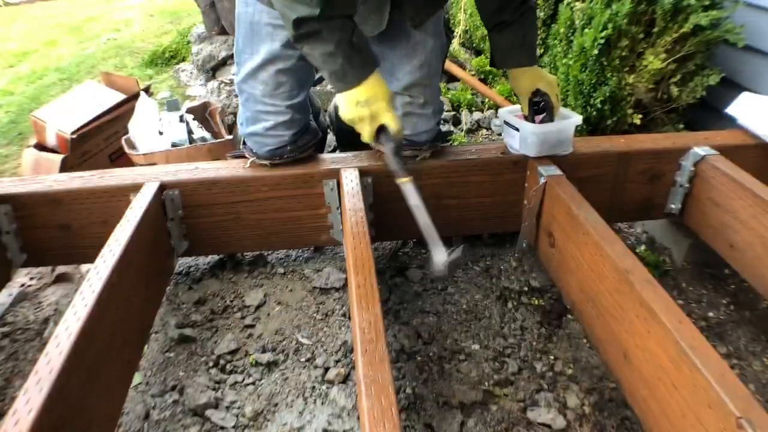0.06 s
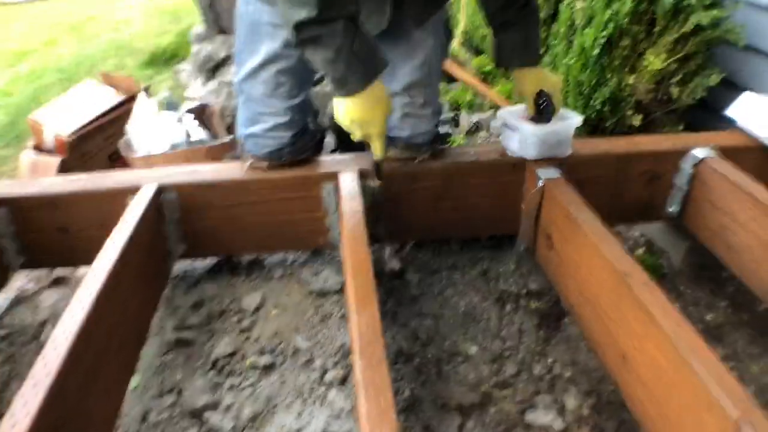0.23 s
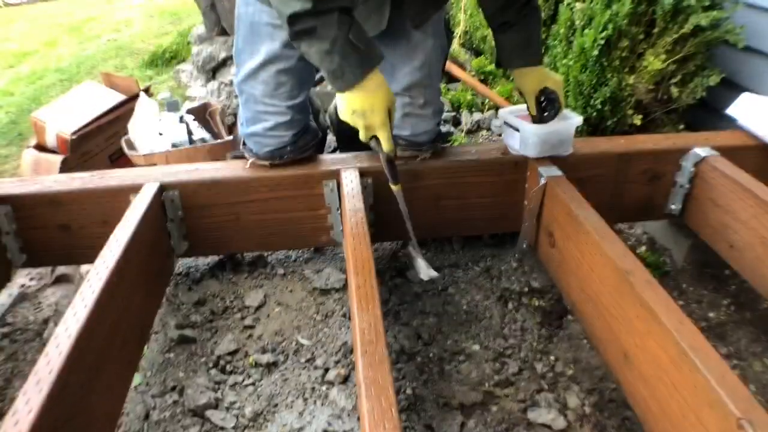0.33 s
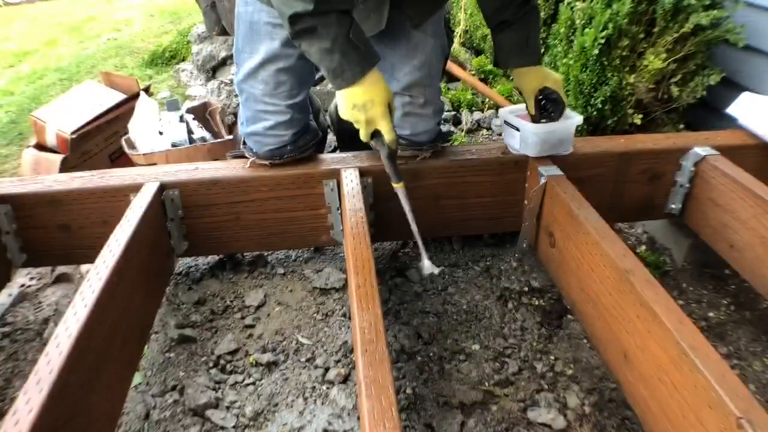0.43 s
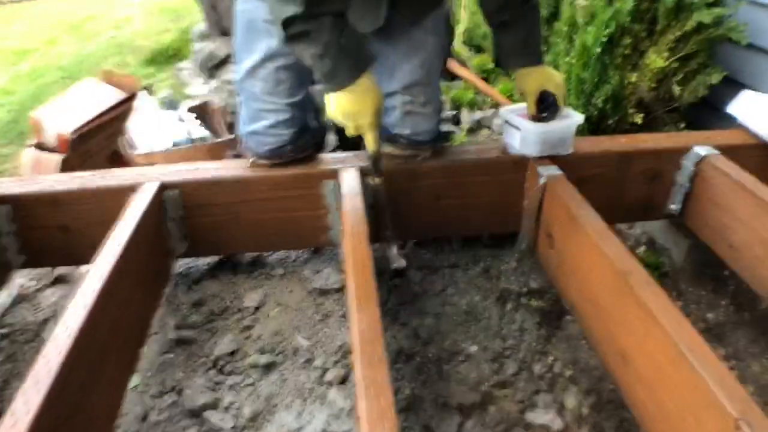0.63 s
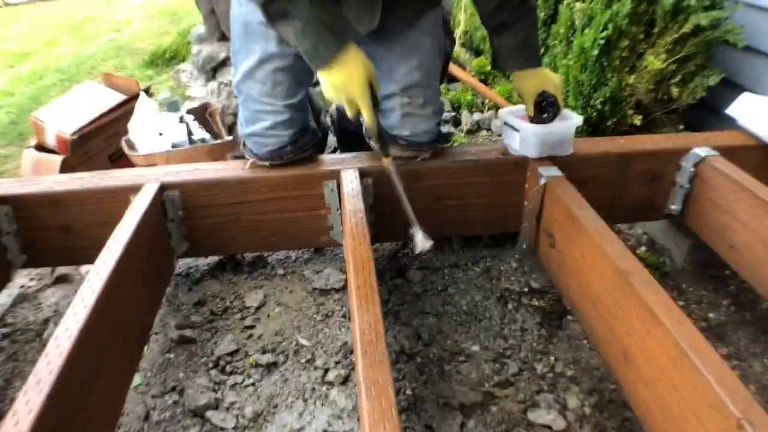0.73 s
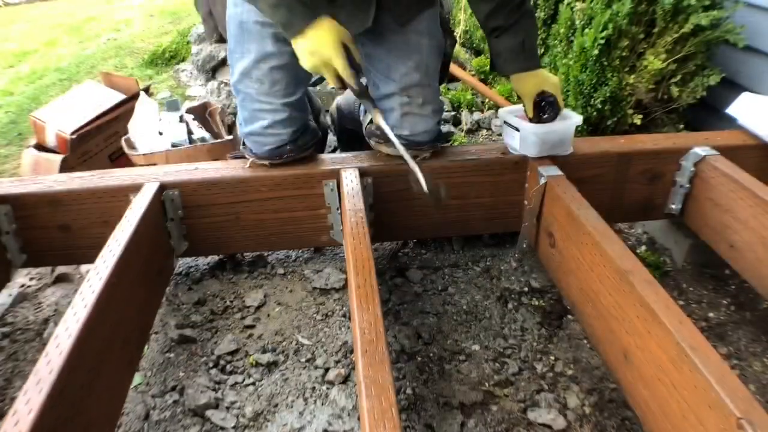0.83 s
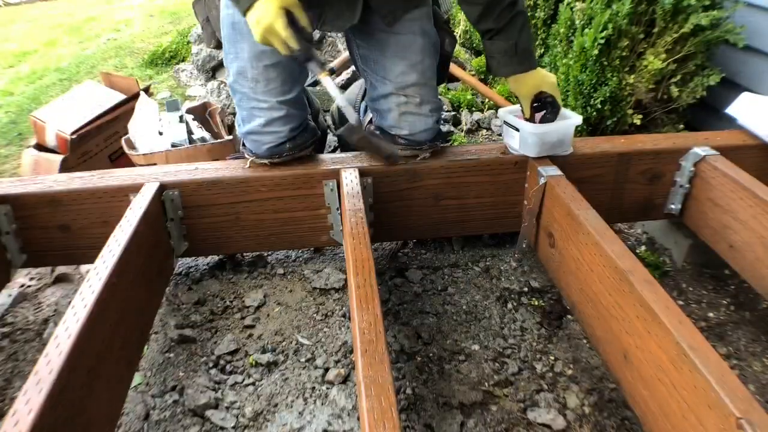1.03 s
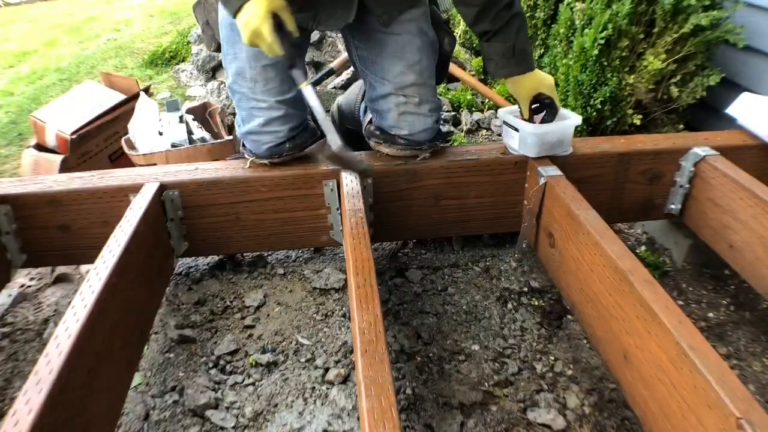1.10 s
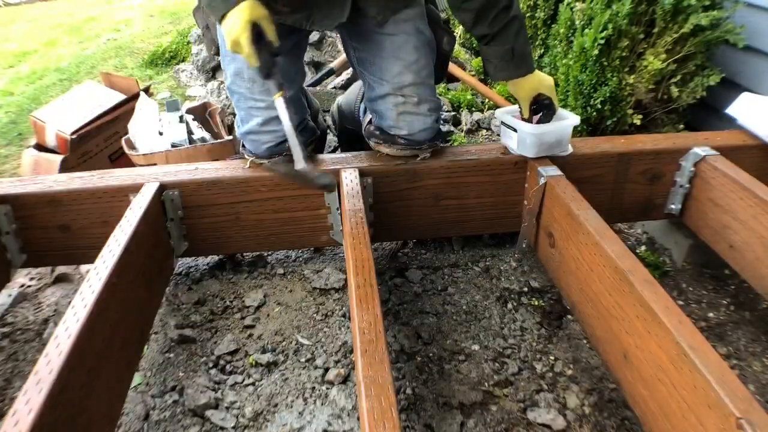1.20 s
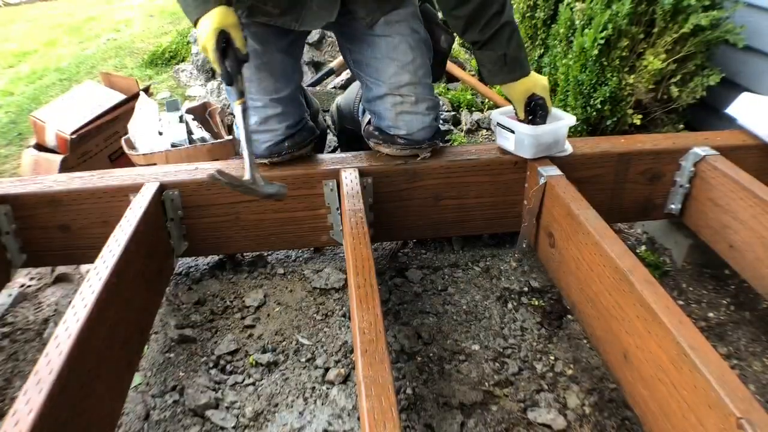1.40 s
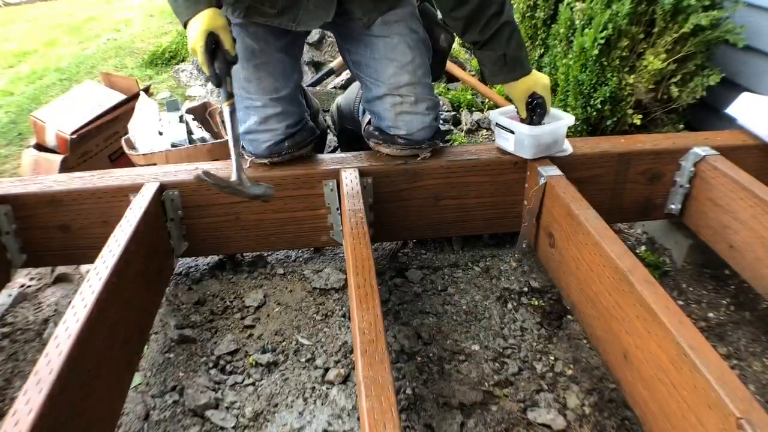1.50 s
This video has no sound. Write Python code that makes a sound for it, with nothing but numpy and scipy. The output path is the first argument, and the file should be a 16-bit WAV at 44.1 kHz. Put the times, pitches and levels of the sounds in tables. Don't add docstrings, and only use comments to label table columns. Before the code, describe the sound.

A hammer cracks sharply twice in quick succession, shaking wooden joists and a loose metal bracket, then boards settle softly while a hand stirs small nails in a tub; quiet yard, near microphone.

```python
import sys
import numpy as np
from scipy import signal
from scipy.fft import rfft, irfft
from scipy.io import wavfile
from scipy.ndimage import uniform_filter1d

SR = 44100
rng = np.random.default_rng(int(sys.argv[2]) if len(sys.argv) > 2 else 0)


def wrap_up_sound(samples):
    columns = np.atleast_2d(samples).T
    tamed = np.clip(columns, -1, 1)
    steps = np.round(tamed * 32767).astype(np.int16)
    wavfile.write(sys.argv[1], SR, steps)


def nominal_scale(level):
    x = np.asarray(level, float) / 20
    return 10 ** x


N = 68355

# (frequency [Hz], level [dB])
HUSH_COLOUR = [(12, -39), (20, 0), (110, 11.5), (319, -22), (607, 0.5), (738, -2.5), (8410, -20.5),
               (10500, -23), (16000, -14)]
# (frequency [Hz], level [dB])
RUMBLE_COLOUR = [(12, -53), (20, -56), (37, 11), (91, 1), (182, 2.5), (285, -6), (400, -9.5), (520, -6.5),
                 (880, -120)]
# (time [s], level [dB])
STIR_LEVEL = [(0, -58), (.09, -62), (.125, -52.5), (.16, -67.5), (0.221, -45), (.3, -62.5), (.45, -63.5),
              (0.562, -79), (.58, -46.5), (.63, -56.5), (.75, -58), (.9, -66), (1.1, -66), (1.241, -57),
              (1.305, -51), (1.36, -59), (1.44, -56), (1.55, -60)]
# (frequency [Hz], level [dB])
STIR_COLOUR = [(250, -9), (900, 1), (1500, 1), (3300, -3), (7900, -12), (10600, -8), (16000, -15)]
# (time [s], level [dB], frequency [Hz], time to fall 60 dB [s])
PINGS = [(0.0034, -38.5, 10920, 0.069), (0.0195, -37.5, 10440, 0.044), (0.0524, -51, 10540, 0.15),
         (0.0717, -47, 10500, 0.14), (0.1189, -37.5, 10200, 0.09), (0.1578, -41, 10270, 0.17),
         (0.182, -39, 10760, 0.034), (0.406, -41.5, 10970, 0.025), (0.428, -44, 10560, 0.13),
         (0.4684, -46.5, 10340, 0.062), (0.5011, -34.5, 10300, 0.083), (0.7407, -43.5, 11000, 0.052),
         (0.7721, -43, 10430, 0.089), (0.9223, -44.5, 10800, 0.1), (0.9428, -44, 10350, 0.14),
         (1.0326, -49, 10640, 0.064), (1.0823, -51, 10550, 0.084), (1.1296, -45, 10660, 0.11),
         (1.2625, -54, 10600, 0.12), (1.3278, -29.5, 10520, 0.026), (1.328, -43, 8760, 0.033),
         (1.335, -40, 10600, 0.11), (1.371, -39, 10200, 0.039), (1.4153, -47.5, 11100, 0.17),
         (1.465, -40.5, 10820, 0.077), (1.5444, -44, 10400, 0.046), (.2112, -34, 10520, 0.05),
         (.2144, -31.5, 10550, 0.06)]
# (time [s], level [dB], tub note [Hz], brightness [dB per octave], time to fall 60 dB [s])
TICKS = [(.005, -43, 900, 0, 0.14), (0.0422, -34, 2040, -2.5, 0.045), (.058, -42.5, 1340, -2, 0.045),
         (0.113, -44, 2570, -3, 0.1), (0.173, -41.5, 2520, -2, 0.086), (.199, -47.5, 900, -5.5, 0.15),
         (0.435, -38.5, 5300, -2.5, 0.026), (.501, -44.5, 4040, -4.5, 0.047), (.577, -31.5, 2600, 7, 0.031),
         (0.6152, -36, 6160, -2, 0.033), (0.77, -38, 14000, 11, .025), (.793, -36.5, 1823, -3.5, 0.04),
         (0.832, -38.5, 950, -2.5, 0.051), (.944, -43, 3030, -1.5, 0.035), (1.03, -47.5, 1660, -5, 0.045),
         (1.1298, -36, 776, -3.5, 0.066), (1.14, -45.5, 1500, -11.5, 0.054), (1.198, -44, 2190, -3.5, 0.12),
         (1.256, -48.5, 1915, -6, .05), (1.264, -41, 1920, -5, 0.06), (1.29, -40, 3230, -6, 0.054),
         (1.299, -38, 3160, -4.5, .06), (1.315, -38.5, 2000, -1, 0.1), (1.321, -40.5, 717, -5, 0.1),
         (1.3455, -32.5, 4200, -1.5, 0.052), (1.348, -46, 800, -10, 0.033), (1.381, -37.5, 1680, -2, 0.044),
         (1.412, -42.5, 3030, -2.5, .05), (1.415, -31.5, 2100, -.5, 0.047), (1.4191, -35, 2030, -.5, 0.023),
         (1.452, -43.5, 2620, -3.5, 0.09), (1.466, -32, 2110, -3, 0.038), (1.541, -39.5, 940, -2, 0.068),
         (1.5445, -35.5, 910, -1.5, 0.063)]
# (time [s], crack [dB], boom [dB], rattle [dB], rebound [dB])
BLOWS = [
    (.2313, -11.5, -24, -26.5, -17),
    (0.636, -7, -23, -25, -29.5),
]
# (frequency [Hz], level [dB])
CRACK_COLOURS = [
    [(500, -32), (1300, -9), (2400, -1.5), (3600, 1.5), (5500, -4.5), (7500, -2.5), (10000, 3), (16000, 0)],
    [(300, -16), (850, -2), (1600, 1), (2400, -0.5), (3300, -0.9), (6000, -2.5), (11000, -3), (16000, 2)],
]
# (frequency [Hz], level [dB])
RATTLE_COLOUR = [(410, -11), (900, -12.5), (1600, -12.5), (2800, -17), (4000, -16), (6000, -13.5),
                 (10000, -14.5), (16000, -14)]
# (frequency [Hz], time to fall 60 dB [s], level against the rattle [dB])
BRACKET_NOTE = (9800, 0.2, -21)
# (frequency [Hz], level [dB])
ECHO_COLOUR = [(59, -57), (100, -11), (255, -4.5), (1130, -24.5), (1280, -26), (5300, -24.5),
               (16000, -39.5)]
# (frequency [Hz], level [dB], peak after the blow [s], time to fall 60 dB [s])
JOIST_NOTES = [
    [(92.6, -2, 0.015, .14), (148.4, -19, 0.031, 0.27), (242.5, -5, 0.04, 0.14), (279, -16, 0.067, 0.26),
     (327, -1, 0.032, 0.12), (399.2, -13, 0.049, .15), (476, -9, 0.03, 0.23), (599.8, 0, 0.042, 0.069),
     (706, -6, 0.027, 0.15), (749.5, -12, 0.041, 0.16), (809, -9, 0.043, 0.088), (903, -4.5, 0.032, 0.093),
     (989, -11.5, 0.044, 0.11), (1251, -5.5, 0.034, 0.092)],
    [(114.2, -4.5, 0.018, 0.13), (156.9, -10.5, 0.036, 0.25), (199.5, -2, 0.025, 0.11),
     (219.4, -9, 0.05, 0.2), (257.7, 1, 0.04, 0.094), (280, -15, 0.052, 0.16), (333, -4, 0.028, 0.11),
     (369, -13.5, 0.037, 0.18), (440.3, -16.5, 0.055, 0.14), (479, -10.5, .03, 0.13),
     (541.5, -6, 0.022, 0.11), (684, -14.5, .03, 0.15), (804, -11, 0.023, .1), (583, -7, .015, 0.081)],
]
# (frequency [Hz], level [dB])
JOIST_FILL_COLOUR = [(50, -40), (150, -8), (300, 3), (600, 4), (900, -11), (3000, -40)]
# (frequency [Hz], level [dB])
REBOUND_COLOUR = [(180, -32), (500, -9), (1200, -10.5), (2400, -15.5), (4090, -24), (6100, -25.5),
                  (9880, -30), (16000, -19)]
# (time [s], level [dB], frequency
# [Hz], rise [s], time to fall 60 dB [s])
THUDS = [(.60, -50.5, 312, 0.016, .1), (0.625, -36, 300, 0.0043, .05), (1.1305, -45.5, 914, 0.0018, 0.049),
         (.238, -26.5, 84, .012, .12), (.644, -23, 98.7, 0.0095, 0.091), (.69, -39, 75, .015, .1),
         (.2645, -23, 1230, 0.0052, 0.057), (.266, -26, 2130, 0.0017, 0.027),
         (0.6406, -9.5, 443, 0.00064, 0.01), (.745, -44, 158, .015, 0.089), (.745, -43, 280, 0.0075, 0.048),
         (.76, -52, 455, 0.012, .15), (.80, -50, 125, 0.016, 0.087), (.81, -50.5, 260, 0.017, .12),
         (.82, -50, 440, 0.028, 0.13), (.842, -40.5, 183.6, 0.0097, 0.16),
         (.885, -46.5, 242.3, .035, 0.071), (0.939, -50.5, 121, 0.018, 0.088),
         (0.2659, -19.5, 1015, 0.0009, 0.019)]

EARLY_S = 0.001
BLOW_S = 26000 / SR
SHAKE_DELAY_S = 0.0077


def evened(x):
    return x / np.sqrt(np.mean(x ** 2) + 1e-20)


def colour(x, points, tilt_db=0):
    table_hz, table_db = np.transpose(points)
    hz = np.fft.rfftfreq(len(x), 1 / SR) + 1
    gain_db = np.interp(np.log(hz), np.log(table_hz), table_db)
    gain_db += tilt_db * np.log2((hz + 300) / 3000)
    return irfft(rfft(x) * nominal_scale(gain_db), len(x))


def flattened(x):
    z = rfft(x)
    bumps = np.sqrt(uniform_filter1d(abs(z) ** 2, size=700) + 1e-12)
    return irfft(z / bumps, len(x)) * np.linalg.norm(x)


def clock(seconds):
    return np.arange(2 * round(seconds * SR / 2)) / SR


def noise(seconds):
    return rng.standard_normal(2 * round(seconds * SR / 2))


def coloured_noise(seconds, points, tilt_db=0):
    return evened(colour(noise(seconds), points, tilt_db))


def lumps(seconds, size):
    return evened(uniform_filter1d(uniform_filter1d(noise(seconds), size), size))


def resonate(x, hz, width_hz):
    pole = np.exp((2j * np.pi * hz - np.pi * width_hz) / SR)
    return 2 * signal.lfilter([1 - abs(pole)], [1, -pole], x).real


def shape(seconds, rise_s, t60, start_db=-40):
    t = clock(seconds)
    climb_db = start_db * (1 - t / rise_s)
    fall_db = -60 * (t - rise_s) / t60
    return nominal_scale(np.where(t < rise_s, climb_db, fall_db))


def add(mix, s, sound):
    part = mix[round(s * SR):][:len(sound)]
    part += sound[:len(part)]


def yard():
    span = (N + 1) / SR
    hush = nominal_scale(-59) * coloured_noise(span, HUSH_COLOUR)
    rumble = coloured_noise(span, RUMBLE_COLOUR) * nominal_scale(-57.5 - 0.5 * lumps(span, size=1200))
    return (hush + rumble)[:N]


def stirring():
    span = (N + 1) / SR
    grains_per_s, spread_db = 2500, -5
    size = nominal_scale(spread_db * np.minimum(rng.exponential(1, N + 1), 4))
    starts = size * (rng.random(N + 1) < grains_per_s / SR)
    grains = signal.lfilter([1], [1, -.985], starts) * noise(span)
    rustle = evened(colour(grains, STIR_COLOUR)) * nominal_scale(0.5 + 2.44 * lumps(span, size=300))
    time_s, level_db = np.transpose(STIR_LEVEL)
    return rustle[:N] * nominal_scale(np.interp(np.arange(N) / SR, time_s, level_db))


def ping(db, hz, t60):
    width_hz, click_db = 420, -7
    ringing = resonate(resonate(noise(.15), hz, width_hz), hz, width_hz)
    tone = evened(ringing) * shape(.15, 0.00061, t60, -20)
    click = evened(resonate(noise(.15), hz, 2300)) * shape(.15, .0004, 0.02)
    return nominal_scale(db - 9) * (tone + nominal_scale(click_db) * click)


def tick(db, hz, tilt_db, t60):
    scratch = coloured_noise(.12, [(200, -20), (500, 0), (16000, 0)], tilt_db)
    scratch *= nominal_scale(3 * lumps(.12, size=40))
    pure = np.clip(900 / hz, .2, 1) * np.sin(2 * np.pi * hz * clock(.12))
    fuzzy = 0.73 * evened(resonate(noise(.12), hz, 0.32 * hz))
    tub_db = -7 - 1.65 * tilt_db - 0.85 * np.log2(hz / 800)
    hit = shape(.12, 0.00091, t60, -51)
    return nominal_scale(db - 9.5) * (scratch + nominal_scale(tub_db) * (pure + fuzzy)) * hit


def crack(db, points):
    rise_s, t60 = 0.0014, 0.018
    snap_db, snap_t60 = -8.5, 0.0024
    burst = shape(BLOW_S, rise_s, t60, -22.5) + nominal_scale(snap_db) * shape(BLOW_S, rise_s, snap_t60)
    sound = colour(flattened(noise(BLOW_S) * burst), points)
    return nominal_scale(db) * sound * (clock(BLOW_S) < .1)


def bracket_rattle(db):
    rattle = coloured_noise(BLOW_S, RATTLE_COLOUR) * shape(BLOW_S, 0.034, 0.11, -4)
    rattle *= np.minimum(clock(BLOW_S) / 0.011, 1)
    hz, t60, note_db = BRACKET_NOTE
    ring = evened(resonate(noise(BLOW_S), hz, 150)) * shape(BLOW_S, 0.016, t60, -25)
    return nominal_scale(db) * (rattle + nominal_scale(note_db) * ring)


def yard_echo(db):
    wash = coloured_noise(BLOW_S, ECHO_COLOUR) * shape(BLOW_S, 0.013, 0.43, 0)
    return nominal_scale(db) * wash * nominal_scale(0.29 * lumps(BLOW_S, size=200))


def joist_boom(db, notes):
    t = clock(BLOW_S)
    fill_db, wobble_db = -6, 3.5
    fill = coloured_noise(BLOW_S, JOIST_FILL_COLOUR) * shape(BLOW_S, 0.036, 0.13, -5)
    boom = nominal_scale(fill_db) * fill * np.clip((t - SHAKE_DELAY_S) / 0.0018, 0, 1)
    for hz, note_db, peak_s, t60 in notes:
        swell = shape(BLOW_S, peak_s, t60, -16)
        swell = uniform_filter1d(swell, size=700, mode="nearest")
        swell *= np.clip((t - SHAKE_DELAY_S) / 0.0037, 0, 1)
        level = nominal_scale(note_db + 7.5 + wobble_db * lumps(BLOW_S, size=500))
        boom += level * swell * np.sin(2 * np.pi * (hz * t + rng.random()))
    return nominal_scale(db - 6.5) * boom


def rebound(db):
    return nominal_scale(db) * coloured_noise(.1, REBOUND_COLOUR) * shape(.1, 0.0019, 0.044, 7.7)


def blow(crack_db, boom_db, rattle_db, rebound_db, joist_notes, crack_colour):
    sound = crack(crack_db, crack_colour)
    sound += bracket_rattle(rattle_db)
    sound += yard_echo(rattle_db - 7)
    sound += joist_boom(boom_db, joist_notes)
    add(sound, 0.0355 - EARLY_S, rebound(rebound_db))
    return sound


def thud(db, hz, rise_s, t60):
    return nominal_scale(db) * np.sin(2 * np.pi * hz * clock(.25)) * shape(.25, rise_s, t60, -17.5)


def scene():
    mix = yard() + stirring()
    for s, *settings in PINGS:
        add(mix, s - EARLY_S, ping(*settings))
    for s, *settings in TICKS:
        add(mix, s - EARLY_S, tick(*settings))
    for (s, *levels), notes, points in zip(BLOWS, JOIST_NOTES, CRACK_COLOURS):
        add(mix, s, blow(*levels, notes, points))
    for s, *settings in THUDS:
        add(mix, s, thud(*settings))
    return mix[None]


def roll_off(x):
    return signal.sosfilt(signal.butter(12, 17000, fs=SR, output="sos"), x)


def record(dry):
    bass_cut_hz, limit, treble_edge_hz = 53, 0.51, 15800
    bass_cut = signal.butter(3, bass_cut_hz, "high", fs=SR, output="sos")
    limited = limit * np.tanh(signal.sosfilt(bass_cut, dry) / limit)
    treble_cut = signal.firwin(255, treble_edge_hz, window=("kaiser", 6), fs=SR)
    finished = signal.oaconvolve(limited, treble_cut[None], "same")
    return roll_off(finished)


dry = scene()
out = record(dry)
wrap_up_sound(out)
```